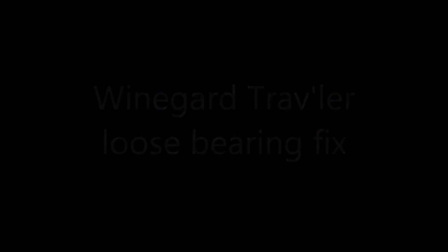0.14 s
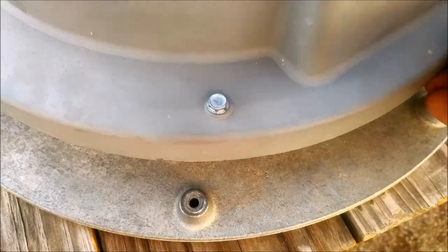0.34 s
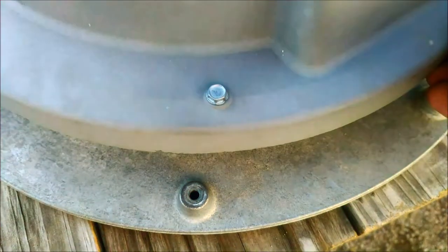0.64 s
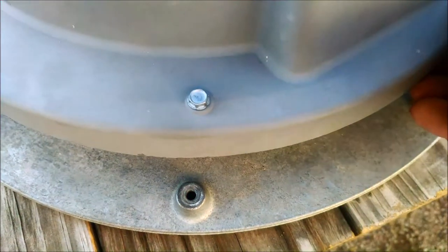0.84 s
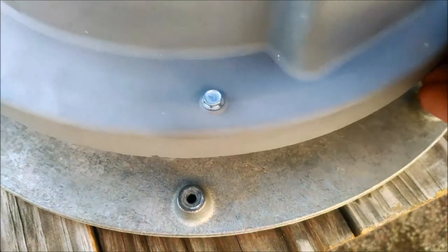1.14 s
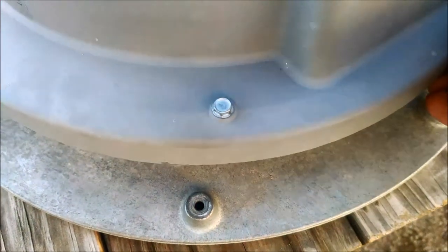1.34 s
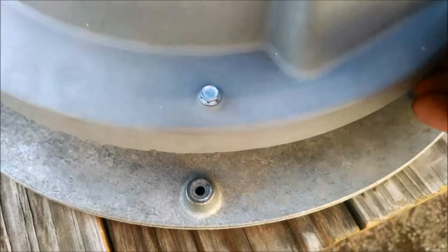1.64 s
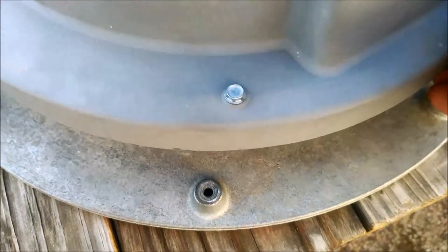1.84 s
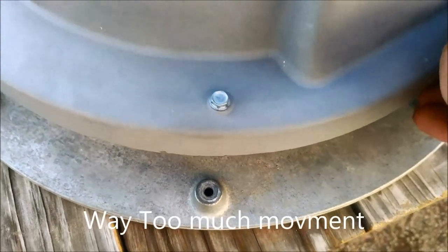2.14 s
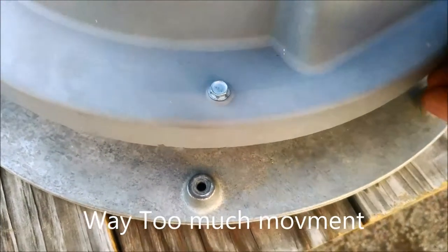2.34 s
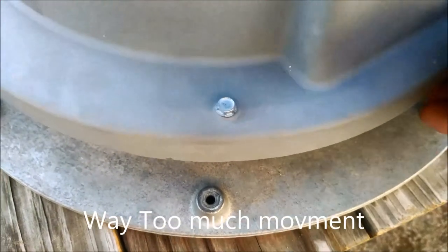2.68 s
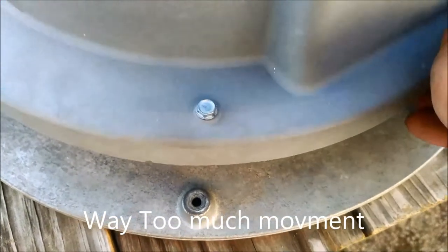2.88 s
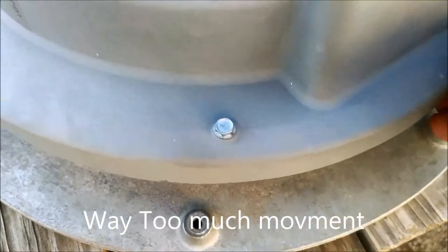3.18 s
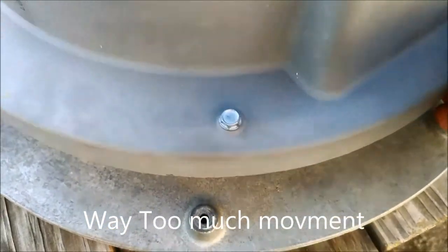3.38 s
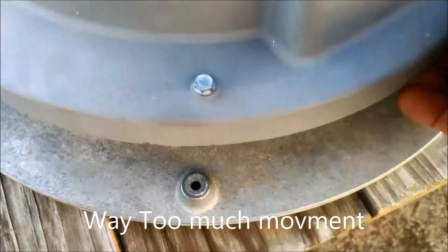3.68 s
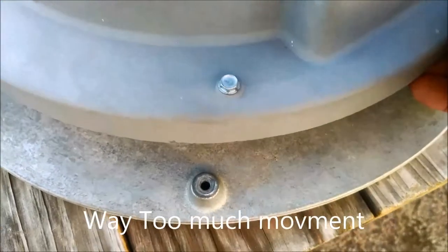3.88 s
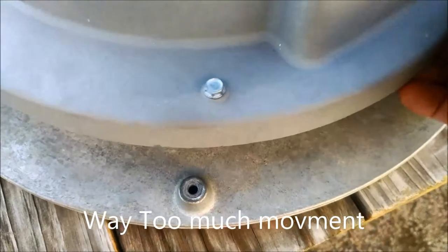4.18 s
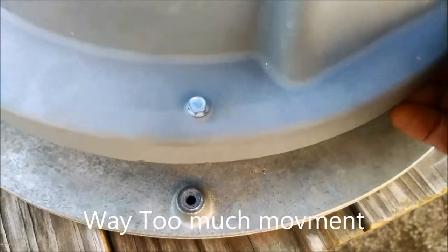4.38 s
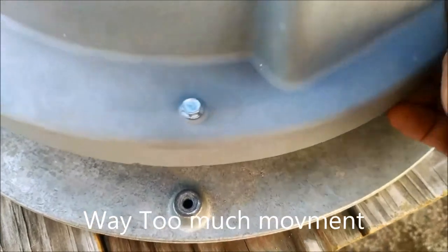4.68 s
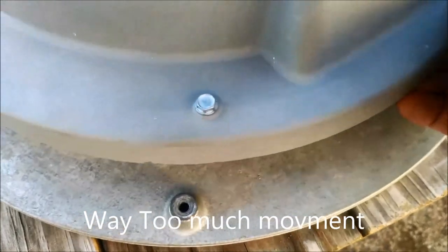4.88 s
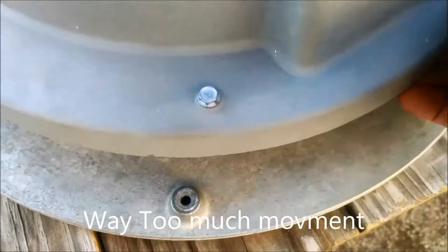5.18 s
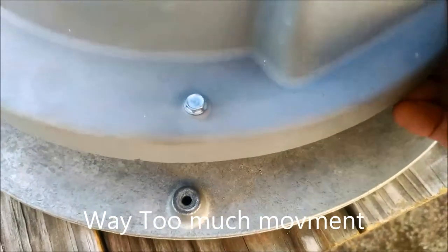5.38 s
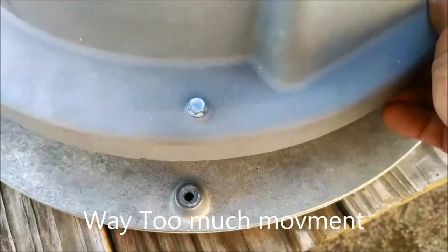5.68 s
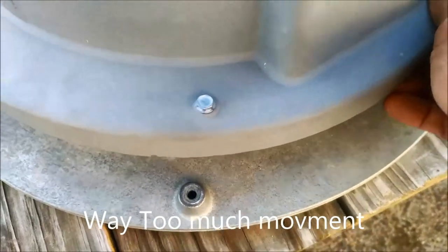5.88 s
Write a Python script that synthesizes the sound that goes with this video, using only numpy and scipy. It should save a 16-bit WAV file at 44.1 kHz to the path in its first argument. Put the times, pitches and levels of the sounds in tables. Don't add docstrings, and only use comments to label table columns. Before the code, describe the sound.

Loose bearing play: short, bright metallic knocks with a dull body and hardly any ringing, paired with weaker rebounds and small stray ticks. The rhythm starts steady, pauses briefly near the middle with a thin faint whine, then becomes rapid and forceful. Coarse rubbing grows towards the end. Wooden boards thud and rumble softly underneath; a close handheld microphone adds steady hiss in a dry open-air setting.

```python
import sys
import numpy as np
from scipy import signal
from scipy.fft import rfft, irfft
from scipy.io import wavfile
from scipy.ndimage import uniform_filter1d

SR = 44100
rng = np.random.default_rng(int(sys.argv[2]) if len(sys.argv) > 2 else 0)


def gain_from_db(level_db):
    decades = np.asarray(level_db, float) / 20
    return 10 ** decades


def digitize_waveform(pressure):
    field = np.atleast_2d(pressure).T
    bounded = np.clip(field, -1, 1)
    quanta = np.round(bounded * 32767).astype(np.int16)
    wavfile.write(sys.argv[1], SR, quanta)


N = 265482
PEAK_S = 0.0015054

# f/Hz, level/dB, t60/s
DULL_MODES = [(980, -20, .05), (1160, -14, .05), (1330, -10, .05), (1440, -9, .045), (1600, -9, .045),
              (1700, -9, .05), (1842, -4, .06), (2265, -5, .045), (2365, -6, .045), (1945, -1, .058),
              (2050, -1, .058)]
# f/Hz, level/dB, t60/s
BRIGHT_MODES = [(2831, -5.5, 0.0088), (3112, -2.5, 0.013), (3258, -16, 0.04), (3429, -10, 0.016),
                (3752, -5.5, 0.0064), (4180, -4.5, 0.0061), (4600, -22, 0.02)]
# f/Hz, level/dB, t60/s
TOP_MODES = [(5205, -0.5, 0.012), (5607, -1.5, 0.0069), (6076, -2.5, 0.011), (6620, -12.5, 0.024),
             (7355, -11, 0.018), (7920, -16, 0.021), (8444, -16, 0.019), (10380, -34.5, 0.013),
             (11340, -28.5, 0.022), (12200, -18, 0.0115)]
# f/Hz, density/(dB per Hz)
SHELL_COLOUR = [(180, 1.5), (300, -10.5), (527, -31.5), (715, -9), (940, -24.5), (1140, -3), (1620, -2),
                (1940, -3.5), (2240, -7.5), (3190, -16.5), (5250, -25), (6900, -25.5), (14000, -30)]


def casting():
    _, db, bright_db, top_db, _ = contacts().T
    dull_db = db - 10 * np.log10(4.0 + 10 ** (bright_db / 10))
    dull = struck(DULL_MODES, dull_db, spread_db=2.5, rough_db=14.5, chatter_db=-43, chatter_t60=0.072)
    bright = struck(BRIGHT_MODES, dull_db + bright_db + 5.0,
                    spread_db=1.0, rough_db=14.5, chatter_db=-37.5, chatter_t60=0.12)
    top = struck(TOP_MODES, dull_db + top_db + 3.5,
                 spread_db=6.0, rough_db=17.5, chatter_db=-38.5, chatter_t60=0.11)
    top = passed(top, [4000, 12000], "bandpass", order=2)

    after = swell(force(db - 25.5 - 0.76 * lightness()), 0.00081, 0.22)
    after = after * gain_from_db(1.6 * walk(60)) * noise(SHELL_COLOUR)
    linger = swell(force(db - 41.5 - lightness()), 0.0013, 0.44)
    linger = linger * passed(noise(SHELL_COLOUR), (1150, 4200), "bandpass", order=2)

    modes = passed(passed(dull + bright, 7300, "low", order=2) + top, 1110, "high")
    return modes + passed(after + linger, 9800, "low", order=2)


def struck(modes, db, spread_db, rough_db, chatter_db, chatter_t60):
    push, times, light = force(db), contacts()[:, 0], lightness()
    chatter = gain_from_db(chatter_db + 5.3 * walk(90)) * swell(push, 0.0012, chatter_t60)
    rattle = gain_from_db(rough_db) * push + chatter
    t = np.arange(N) / SR
    latest = np.maximum(np.searchsorted(times - 0.004, t) - 1, 0)
    since = t - times[latest] - PEAK_S
    smooth = gain_from_db(-0.67 * light)[latest]
    spread_db = spread_db * (1 + 0.1 * light)
    rough, out = grit(spread_db=2.5), 0
    for hz, mode_db, t60 in modes:
        lag, share = np.clip(rng.standard_normal((len(db), 2)).T, -1.6, 1.6)
        snap = push * np.cos(2 * np.pi * hz * since + 1.26 * lag[latest])
        grind = rattle * smooth * np.roll(rough, int(hz))
        level = gain_from_db(mode_db + spread_db * share)[latest]
        out = out + ring(level * (snap + grind), hz, t60)
    return out


def force(db):
    x, t = np.zeros(N + 2048), np.arange(-1024, 1024) / SR
    for (s, strength_db, *_, build_ms), size in zip(contacts(), gain_from_db(db)):
        rise = 1.32 * max(build_ms, 0.3) / 1000
        fall = 0.28 * rise + 0.00025 * np.clip(-12 - strength_db, 0, 12)
        shape = np.exp(-np.sqrt(0.26 + (t / np.where(t < 0, rise, fall)) ** 2))
        i = int((s + PEAK_S) * SR)
        x[i:i + 2048] += size * shape / (0.64 * (rise + fall) * SR)
    return x[1024:N + 1024]


# t/s, level/dB, touch lead/ms, touch level/dB, deck thump/dB
SLAM_HITS = [(0.7629, -5.5, 11.8, -22, -20.5), (1.139, -7.5, 12, -23.5, -17),
             (1.4932, -5.5, 11.7, -22.5, -19), (1.7932, -7, 13, -28, -16.5), (2.1162, -5, 13, -20.5, -15),
             (2.376, -8, 13.4, -26, -22), (2.7064, -3, 12.8, -18, -21.5), (3.034, -7.5, 8.3, -17.5, -18.5),
             (3.5169, -5, 12.7, -16.5, -19), (3.7884, -6.5, 13.3, -20.5, -17),
             (4.0402, -4.5, 9.2, -15.5, -20.5), (4.19, 1.9, 6.5, -26, -14), (4.3695, -3.5, 18, -14, -18),
             (4.5217, -2.1, 6.6, -13.5, -13), (4.7048, -0.5, 8.7, -11.5, -14),
             (4.8485, 0.5, 3.1, -12.5, -9.5), (4.9996, -3.5, 4.2, -5, -15.5), (5.1465, 1.8, 4.7, -42, -8.5),
             (5.304, -7, 11, -13, -23.5), (5.4571, -2.5, 10.5, -24, -13.5),
             (5.6227, -4.5, 11.5, -15.5, -20.5), (5.7645, -5.5, 9.8, -16.5, -16),
             (5.925, -5.5, 14.2, -13, -21)]
# t/s, level/dB, bright modes/dB, deck thump/dB
REBOUND_HITS = [(.814, -10.5, -1.5, -29), (1.1758, -17, -6, -19.5), (1.5288, -19.5, -7, -26),
                (1.834, -16.5, -12, -19.5), (2.1413, -15.5, -3.5, -15), (2.4181, -27, 3, -19),
                (2.743, -15.5, -2.5, -20), (3.0797, -20, -6.5, -28.5), (3.5731, -8, -0.5, -23.5),
                (3.833, -15, 1, -27), (4.0677, -14, -13, -22.5), (4.226, -16, 3, -20.5),
                (4.393, -15, -0.5, -25.5), (4.546, -21.5, -17, -17), (4.72, -22, -22, -40),
                (4.887, -47, -4, -21), (5.037, -33, 5, -20.5), (5.179, -28, 4, -42),
                (5.331, -12.5, -17, -23), (5.494, -16.5, 0, -29.5), (5.6505, -16.5, -11, -20.5),
                (5.7856, -17, -21, -21.5), (5.9468, -30, -13, -23)]
# t/s, level/dB, bright modes/dB, top modes/dB
BALL_TICKS = [(.774, -24, -25, -37), (1.205, -25.5, 14, -27), (1.8162, -17, -1, -15),
              (1.8609, -26.5, 17, 1), (2.2809, -33.5, -24, -28), (4.2514, -32, 12, -22),
              (2.3881, -13.5, -14, -30), (2.428, -23.5, 4, 1.5), (2.637, -24.5, 10.5, -34),
              (2.9532, -37, -14, -17), (3.476, -32.5, -7, -26), (3.491, -25.5, -4, -26),
              (3.9782, -16.5, -6, -42), (4.02, -15, -7, -48), (4.1656, -23.5, 6, -19),
              (4.3182, -13, 1.5, -30), (4.497, -31, 15, -14), (4.666, -19.5, -7, -34),
              (4.827, -18.5, 1.5, -9), (4.8574, -17, -17, -15), (4.981, -17.5, -18, -37),
              (5.1213, -18, -3, -19), (5.268, -21.5, -10, -33), (5.4273, -31.5, 8, 8),
              (5.5814, -36, 10, -12), (5.602, -23, -14, -15), (5.6892, -18.5, 1, -20), (5.727, -35, 9, -24),
              (5.801, -14.5, 6, -11), (5.8758, -23, -4, -17)]


def contacts():
    slam, touch = (-0.54, -11.5, 1.81), (7.3, -7.5, 0.81)  # bright/dB, top/dB, build-up/ms
    rebound_top_db, rebound_ms = -15, 1.78
    rows = [(*tick, 0.93) for tick in BALL_TICKS]
    for s, db, lead_ms, touch_db, _ in SLAM_HITS:
        rows.append((s, db, *slam))
        rows.append((s - lead_ms / 1000, touch_db, *touch))
        rows.append((s - lead_ms / 2000, touch_db - 9.5, *touch))
    for s, db, bright_db, _ in REBOUND_HITS:
        build_ms = rebound_ms - 1.3 * max(db + 17, 0)
        rows.append((s, db, bright_db, rebound_top_db, build_ms))
        if db < -11.5:
            for stutter_s in (-0.012, 0.012):
                rows.append((s + stutter_s, db - 8.5, bright_db, rebound_top_db, rebound_ms))
    return np.array(sorted(rows))


def lightness():
    s, db = contacts().T[:2]
    return np.isin(s, np.transpose(BALL_TICKS)[0]) * np.clip(-17 - db, 0, 12)


# t/s, speed as level/dB, load
SLIDE = [(2.3, -93, 0.18), (2.76, -63, -.3), (2.84, -46.5, -.8), (2.96, -53, -1.45), (3.04, -53, -0.43),
         (3.15, -46, -0.45), (3.21, -69.5, -.4), (3.84, -73, -.1), (3.89, -46.5, -.4), (4.1, -94, 0.74),
         (4.22, -59, .6), (4.39, -40.5, 0.53), (4.66, -39, 0.58), (5.3, -51.5, .8), (5.51, -31, 0.49),
         (5.64, -31, 0.71), (5.75, -50, 0.88), (5.9, -45, 1)]
# level/dB, slope/(dB per unit of load)
SCRAPE_MIX = [
    (-8, -10),
    (-7, 4),
    (-1.4, -6),
    (-9.5, 19.5),
]
# f/Hz, width/Hz, level/dB
SQUEAL_BANDS = [(6030, 190, -6), (5570, 220, 2), (12300, 500, -12)]
UPPER_BANDS = [(6160, 660, 3), (7700, 1300, -8.5), (4800, 3900, -5.5), (12000, 1200, -20),
               (13700, 700, -20)]
MIDDLE_BANDS = [(3430, 320, 2), (3240, 110, -22), (4940, 230, -6.5), (4580, 790, -9)]
LOW_BANDS = [(1790, 250, -4.5), (1510, 300, -17.5), (2140, 67, -8)]
# t/s, level/dB
CREEP_WHINE = [
    (3.1, -54),
    (3.144, -67),
    (3.16, -54),
    (3.21, -59),
    (3.296, -85),
    (3.322, -86),
    (3.394, -58.5),
    (3.484, -56),
    (3.5, -49),
]


def race():
    t = np.arange(N) / SR
    speed_db, load = curve(SLIDE)
    rub = 0
    for (mix_db, slope_db), bands in zip(SCRAPE_MIX, (SQUEAL_BANDS, UPPER_BANDS, MIDDLE_BANDS, LOW_BANDS)):
        part_db = speed_db + mix_db + slope_db * load
        for hz, width_hz, db in bands:
            rub = rub + gain_from_db(part_db + db + 1.36 * walk(18)) * band(hz, width_hz)
    creeping = (t > CREEP_WHINE[0][0]) & (t < CREEP_WHINE[-1][0])
    tone = np.where(t < 3.31, band(5790, 120), band(5890, 120))
    whine = creeping * gain_from_db(curve(CREEP_WHINE)[0] + 2.0 * walk(60)) * tone
    sliding = (t > SLIDE[0][0]) * ~creeping * gain_from_db(2.0 * walk(110) - 8.5)
    return sliding * rub + creeping * gain_from_db(-6.5) * rub + whine


# f/Hz, level/dB, t60/s
DECK_MODES = [(84.3, -5.5, 0.28), (124, 7, 0.12), (165.1, 6.5, 0.16), (177, 5.5, 0.1), (210.5, 4, 0.094),
              (267, -10.5, 0.11), (355, -18.5, 0.1)]
# f/Hz, level/dB, t60/s
HOLLOW_MODES = [(461, -6, 0.018), (632, -5.5, 0.067), (686.7, 6.5, 0.079)]
# t/s, level/dB
RUMBLE_LEVEL = [(.37, -69), (.53, -56), (.61, -57), (.68, -45.5), (.84, -37), (.95, -42.5), (1.67, -40.5),
                (2.11, -44.5), (2.59, -44), (2.77, -37.5), (3.25, -46.5), (3.9, -45.5), (4.1, -38.5),
                (4.99, -38.5), (5.42, -37), (5.63, -32), (6.02, -42.5)]
# f/Hz, density/(dB per Hz)
BOARD_COLOUR = [(12, -65), (20, -31), (117, -6), (172, -11.5), (238, -35), (445, -79), (485, -44.5),
                (528, -73), (600, -50), (780, -71), (1320, -120)]
# t/s, f/Hz, level/dB, t60/s
FINGER_TAP = (.533, 325, -47, .1)


def deck():
    times, thump_db, hollow_db = landings()
    push = swell(clicks(times, thump_db - 38), 0.0016, 0.085)
    thump = sum(ring(push * gain_from_db(db) * rng.standard_normal(N), hz, t60) for hz, db, t60 in DECK_MODES)
    thump = passed(thump, 68, "high", order=4)

    breathe = swell(clicks(times, hollow_db - 28.5), 0.0071, 0.074) * rng.standard_normal(N)
    hollow = sum(gain_from_db(db) * ring(breathe, hz, t60) for hz, db, t60 in HOLLOW_MODES)
    hollow = passed(hollow, [430, 800], "bandpass", order=2)

    sway_db = 2.7 * np.clip(walk(12), -2.5, 1.2)
    rumble = gain_from_db(curve(RUMBLE_LEVEL)[0] - 0.2 + sway_db) * noise(BOARD_COLOUR)

    s, hz, db, t60 = FINGER_TAP
    tap = ring(passed(clicks(np.array([s]), db), 620, "low", order=2), hz, t60)
    return passed(thump + tap, 320, "low") + hollow + rumble


# t/s, level/dB
DOME_PUMPING = [(.7, -2.5), (2.1, -6), (3.5, 8.2), (3.8, 5), (4.2, 9.5), (4.4, 1), (4.85, 6.5), (5.2, -5.5),
                (5.65, 6), (6, -0.5)]


def landings():
    slam, rebound = np.array(SLAM_HITS), np.array(REBOUND_HITS)
    quick = np.diff(slam[:, 0], prepend=0) < 0.22
    hollow_db = np.r_[slam[:, 4] - 20 + 2.5 * quick, rebound[:, 3] - 16.5]
    times = np.r_[slam[:, 0], rebound[:, 0]] - 0.0026
    thump_db = np.r_[slam[:, 4], rebound[:, 3]]
    return times, thump_db, hollow_db + np.interp(times, *np.transpose(DOME_PUMPING))


# f/Hz, density/(dB per Hz)
HISS_COLOUR = [(35, -8), (60, 4.5), (227, -16.5), (301, -10.5), (398, -17), (785, -15), (1090, -19),
               (2410, -14.5), (3190, -18), (16000, -25)]
# t/s, level/dB
HISS_LEVEL = [(.372, -53.5), (.41, -54), (.44, -63), (.7, -59), (3.4, -61), (6.02, -55)]


def phone_hiss():
    return gain_from_db(curve(HISS_LEVEL)[0]) * noise(HISS_COLOUR)


def curve(table):
    s, *columns = np.transpose(table)
    return [np.interp(np.arange(N) / SR, s, c) for c in columns]


def ring(x, hz, t60):
    pole = np.exp((2j * np.pi * hz - np.log(1000) / t60) / SR)
    return signal.lfilter([0, pole.imag], [1, -2 * pole.real, abs(pole) ** 2], x)


def swell(clicks, rise_s, t60):
    fall = signal.lfilter([1], [1, -np.exp(-np.log(1000) / t60 / SR)], clicks)
    keep = np.exp(-1 / rise_s / SR)
    return signal.lfilter([1 - keep], [1, -keep], fall)


def noise(spectrum):
    hz, db = np.transpose(spectrum)
    bins = np.fft.rfftfreq(N, 1 / SR) + 1
    gain = gain_from_db(np.interp(np.log(bins), np.log(hz), db))
    x = irfft(rfft(rng.standard_normal(N)) * gain, N)
    return x / x.std()


def band(hz, width_hz):
    t60 = np.log(1000) / np.pi / width_hz
    x = ring(ring(rng.standard_normal(N), hz, t60), hz, t60)
    return x / x.std()


def walk(rate):
    k = int(SR / rate)
    steps = np.repeat(rng.standard_normal(N // k + 1), k)
    return 1.45 * uniform_filter1d(uniform_filter1d(steps, k), k)[:N]


def clicks(times, db):
    x = np.zeros(N)
    np.add.at(x, (times * SR).astype(int), gain_from_db(db))
    return x


def grit(spread_db):
    grains_db = spread_db * np.minimum(rng.exponential(size=N), 3)
    x = rng.standard_normal(N) * gain_from_db(grains_db)
    return x / x.std()


def passed(x, hz, kind, order=4):
    return signal.sosfilt(signal.butter(order, hz, kind, fs=SR, output="sos"), x)


def scene():
    return (casting() + race() + deck())[None]


def band_limit(x):
    return signal.sosfilt(signal.butter(12, 16640, fs=SR, output="sos"), x)


def record(dry):
    x = passed(dry + phone_hiss(), 52, "high", order=2)
    start_s, fade_s = 0.373, 0.0046
    x = x * np.clip((np.arange(N) / SR - start_s) / fade_s, 0, 1)
    x = 0.85 * np.tanh(x / 0.85)
    x = signal.sosfilt(signal.ellip(10, 0.2, 70, 15850, fs=SR, output="sos"), x)
    return band_limit(x)


dry = scene()
out = record(dry)
digitize_waveform(out)
```